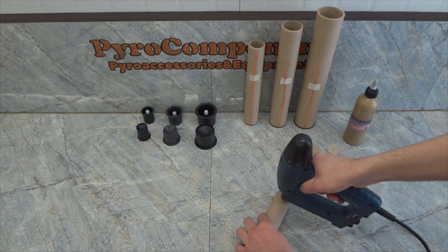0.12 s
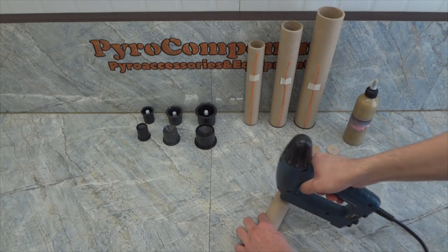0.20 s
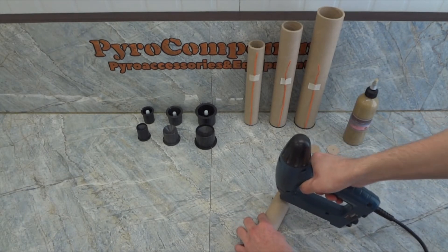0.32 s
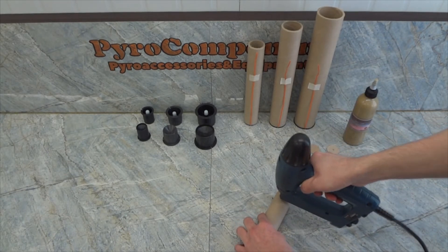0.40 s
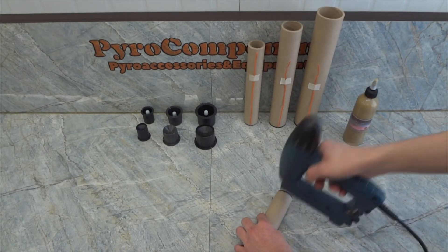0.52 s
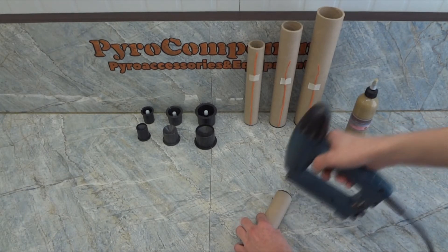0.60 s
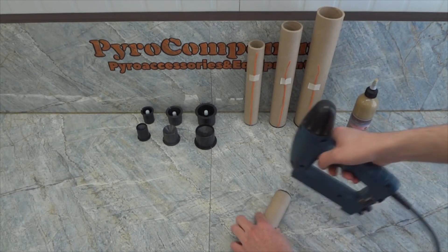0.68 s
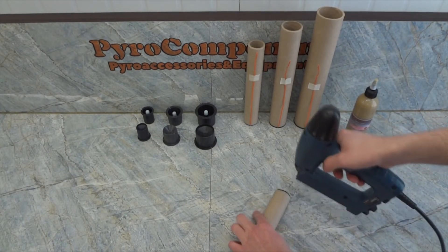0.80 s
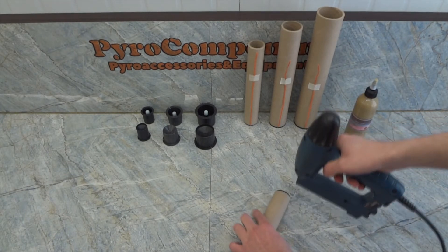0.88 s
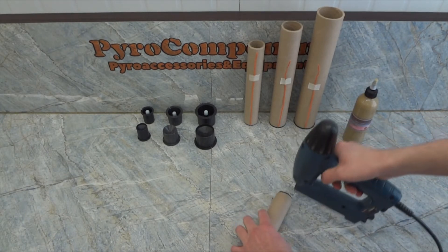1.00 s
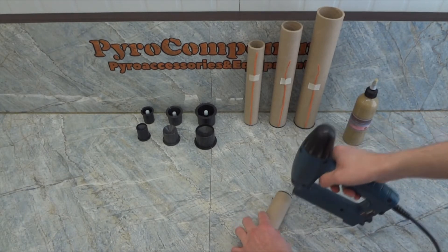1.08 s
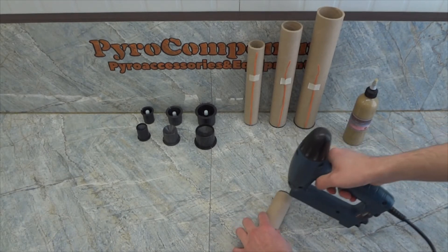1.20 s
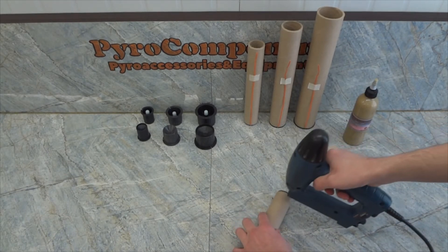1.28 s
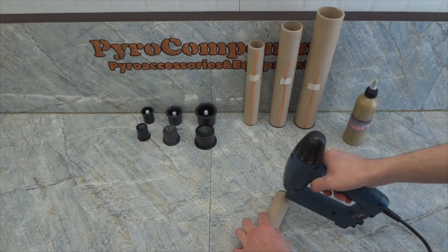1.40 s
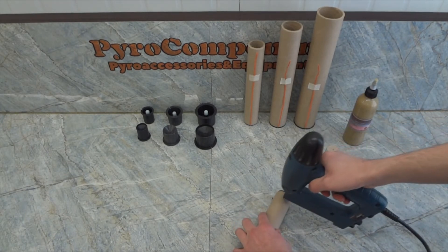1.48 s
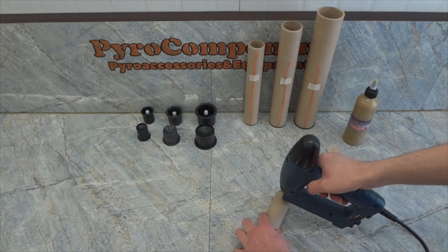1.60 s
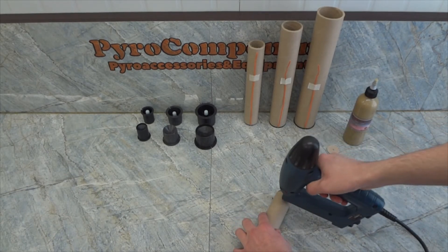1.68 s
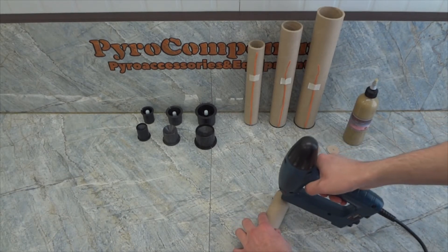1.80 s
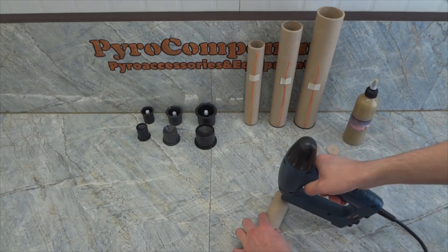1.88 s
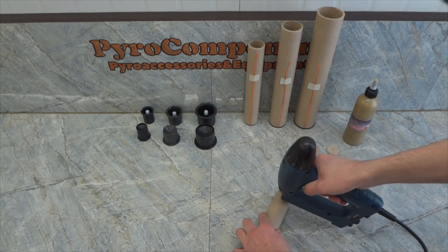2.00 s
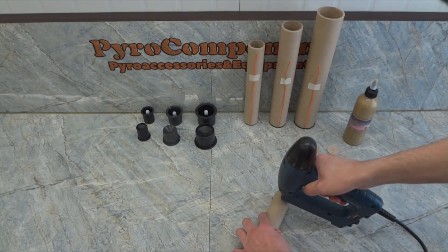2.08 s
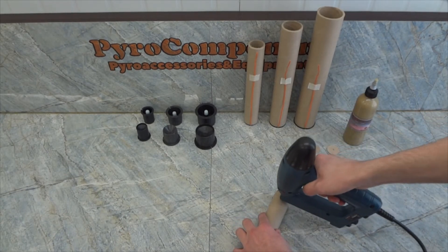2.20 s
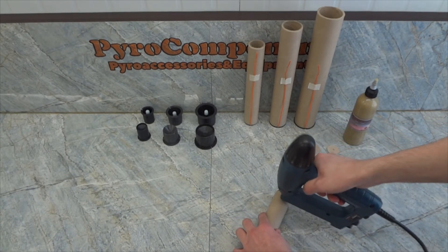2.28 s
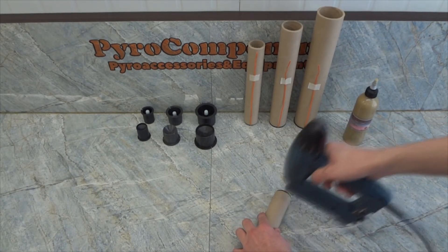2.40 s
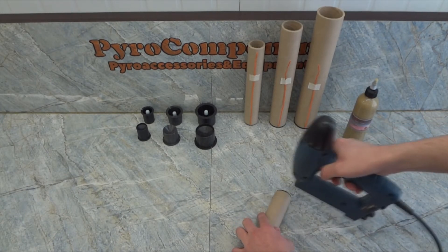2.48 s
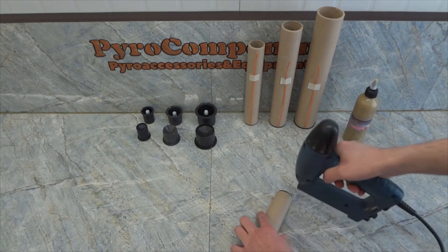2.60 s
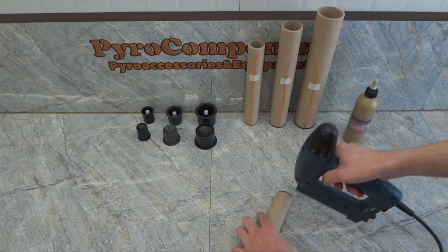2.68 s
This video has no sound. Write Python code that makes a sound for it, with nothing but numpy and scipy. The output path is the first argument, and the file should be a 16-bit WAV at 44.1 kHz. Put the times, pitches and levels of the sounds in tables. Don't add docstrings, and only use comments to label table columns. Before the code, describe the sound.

Electric staple gun shooting twice into a cardboard tube, with clicks and soft knocks between shots

```python
import sys
import numpy as np
from scipy import signal
from scipy.fft import rfft, irfft
from scipy.io import wavfile
from scipy.ndimage import uniform_filter1d

SR = 44100
rng = np.random.default_rng(int(sys.argv[2]) if len(sys.argv) > 2 else 0)


def ratio(d):
    e = np.asarray(d, float) / 20
    return 10 ** e


def int16_out(signal):
    q = np.round(np.clip(np.atleast_2d(signal).T, -1, 1) * 32767)
    wavfile.write(sys.argv[1], SR, q.astype(np.int16))


N = 121275
T = np.arange(N) / SR
HZ = np.fft.rfftfreq(2 * N, 1 / SR) + 1e-3
LEFT_RIGHT = np.array([[1], [-1]])


def curve(table, hz):
    table = np.array(table)
    return np.interp(np.log(hz), np.log(table[:, 0]), table[:, 1])


def colour(x, gain):
    return irfft(rfft(x, 2 * N) * gain)[..., :N]


def causal(db):
    cepstrum = irfft(db * np.log(10) / 20)
    cepstrum[1:N] *= 2
    cepstrum[N + 1:] = 0
    return np.exp(rfft(cepstrum))


def unit(x):
    return x / np.sqrt(np.sum(x ** 2))


def resonate(x, hz, q):
    return signal.lfilter(*signal.iirpeak(hz, q, fs=SR), x)


def bell(distance, width):
    return np.exp(-.5 * (distance / width) ** 2)


def walk(size):
    x = uniform_filter1d(uniform_filter1d(rng.standard_normal(N), size), size)
    return x / x.std()


def add(out, x, t):
    i = int(t * SR)
    out[i:i + len(x)] += x[:N - i]


# f/Hz, t60/s
ROOM_T60 = [(90, 0.8186), (300, 0.632), (700, 0.4145), (1600, 0.4537), (2500, 0.4586), (5000, 0.3886),
            (10000, 0.26235), (15000, 0.2074)]
# f/Hz, side level/dB
ROOM_SIDE = [(60, -42), (125, -32), (250, -24), (500, -19.5), (1000, -12.5), (5000, -12.5), (8500, -13.5),
             (13000, -17)]
# f/Hz, width/octave, share of t60 lost/1
DEAD = [(1130, .12, .2), (1680, .12, .33)]
FIRST_ECHO_S, BUILD_S = 0.00067, 0.0046
LATE_DB, LATE_T60_S, LATE_TOP_HZ = -61, 1.833, 900


def room():
    d = T[:65536]
    noise = rfft(rng.standard_normal((2, len(d))))
    octave = np.log2(np.fft.rfftfreq(len(d), 1 / SR) + 1e-3)
    rise = np.clip((d - FIRST_ECHO_S) / BUILD_S, 0, 1)
    late = ratio(LATE_DB - 60 * d / LATE_T60_S)
    out = 0
    for hz in 30 * 2 ** (np.arange(46) / 5):
        share = np.clip(1 - 5 * abs(octave - np.log2(hz)), 0, 1)
        lost = sum(s * bell(np.log2(hz / centre), width) for centre, width, s in DEAD)
        t60 = curve(ROOM_T60, hz) * (1 - lost)
        decay = np.exp(-np.log(1000) * d / t60) + late / (1 + (hz / LATE_TOP_HZ) ** 2)
        mid, side = irfft(noise * share) * rise * decay
        out = out + mid + ratio(curve(ROOM_SIDE, hz)) * side * LEFT_RIGHT
    return rfft(unit(out) * np.sqrt(2), 2 * N)


# f/Hz, density/(dB per Hz)
HISS = [(30, -18.5), (55, -11.5), (110, -3), (200, -7.5), (500, -7), (1280, -8.5), (2300, -15),
        (13000, -22.5)]
# f/Hz, level/dB
WHINE = [(13485, -83), (13905, -83)]
HISS_DB, HISS_TOP_HZ, FLICKER_DB = -65, 14900, .5
HISS_SIDE_DB, HISS_SIDE_TOP_HZ = 15, 10000
WHINE_WOBBLE_HZ = 25


def hiss():
    spectrum = ratio(curve(HISS, HZ)) / (1 + (HZ / HISS_TOP_HZ) ** 20)
    mid, side = colour(rng.standard_normal((2, N)), spectrum)
    side_gain = ratio(curve(ROOM_SIDE, HZ) + HISS_SIDE_DB) / (1 + (HZ / HISS_SIDE_TOP_HZ) ** 10)
    side = colour(side, side_gain)
    whine = 0
    for hz, db in WHINE:
        phase = 2 * np.pi * np.cumsum(hz + WHINE_WOBBLE_HZ * walk(size=600)) / SR
        whine = whine + np.sqrt(2) * ratio(db) * np.sin(phase)
    level = ratio(HISS_DB + FLICKER_DB * walk(size=2000))
    return (mid + side * LEFT_RIGHT) / mid.std() * level + whine


# start/s, end/s, level/dB, f/Hz
CREAKS = [
    (0, 0.067, -64, 2248),
    (.07, 0.164, -71.5, 5947),
    (0.159, 0.207, -54.5, 5220),
    (0.212, 0.248, -47, 4630),
    (1.65, 1.768, -61.5, 4110),
    (1.708, 1.8, -67, 1890),
    (1.821, 2.1, -72.5, 1910),
    (2.089, 2.186, -60.5, 4510),
    (2.165, 2.182, -57.5, 5000),
]
CREAK_PER_S, CREAK_SPREAD_DB, CREAK_Q = 830, 4, .5


def creaks():
    out = np.zeros(N)
    for start, end, db, hz in CREAKS:
        slips = (rng.random(N) < CREAK_PER_S / SR) * np.sign(rng.standard_normal(N))
        strength = ratio(CREAK_SPREAD_DB * np.minimum(rng.exponential(size=N), 3))
        x = resonate(slips * strength, hz, CREAK_Q)
        out += x / x.std() * ratio(db) * (T >= start) * (T < end)
    return out


KNOCK_S = [0.0175, 0.1760, 0.2340, 1.2514, 1.2520, 1.2560, 1.2625, 1.6335, 1.6340, 1.6385, 1.6930, 1.6950,
           1.7035, 1.7045, 1.7120, 1.7140, 1.7270, 1.7360, 1.7520, 1.7560, 1.8300, 2.0940, 2.1607, 2.1740]
# level/dB, f/Hz, t60/s
KNOCKS = [(-55, 343, 0.034), (-55.5, 362, 0.0225), (-54, 150, 0.028), (-39, 1386, 0.0084),
          (-59, 637.5, 0.028), (-49.5, 1572, 0.0069), (-48, 1806, 0.00775), (-41, 1410, 0.0115),
          (-50, 690, 0.0188), (-36.5, 1700, 0.0116), (-72, 238, 0.025), (-60, 57, 0.1), (-38, 441, 0.033),
          (-37.5, 820, 0.0039), (-38.5, 1700, 0.0133), (-44, 920, 0.037), (-44.5, 600, .03),
          (-46.5, 290, 0.026), (-39.5, 2200, 0.0074), (-56.5, 600, .03), (-85, 62, 0.18),
          (-46.5, 4700, 0.011), (-47, 4700, 0.0083), (-53.5, 100, 0.032)]
KNOCK_ATTACK_S, OVERTONE, OVERTONE_DB = .0005, 1.3, -6.5


def knocks():
    out, d = np.zeros(N), T[:4096]
    for t, (db, hz, t60) in zip(KNOCK_S, KNOCKS):
        ring = np.sin(2 * np.pi * hz * d)
        ring += ratio(OVERTONE_DB) * np.sin(2 * np.pi * OVERTONE * hz * d)
        attack = 1 - np.exp(-d / KNOCK_ATTACK_S)
        add(out, 2 * ratio(db - 60 * d / t60) * ring * attack, t)
    return out


# t/s, level/dB, f/Hz, decay/s
CLICKS = [(0.0300, -48.5, 2800, 0.003), (0.0539, -47, 4140, 0.00088), (0.1611, -38.5, 4980, 0.0011),
          (0.1735, -43, 6118, .001), (0.2125, -51.5, 3950, 0.0023), (0.2245, -36.5, 4500, 0.0018),
          (0.2345, -30, 4647, .001), (0.2385, -15, 7000, 0.0036), (0.758, -60.5, 4468, .002),
          (1.924, -58, 5000, .002), (1.2512, -56, 2800, 0.00224), (2.0937, -49.5, 5100, 0.0032),
          (2.1215, -51.5, 4860, .002), (2.1605, -47, 4000, 0.0022), (2.1748, -24, 4000, 0.0009),
          (2.1788, -26.5, 6100, 0.00067), (1.6335, -46.5, 4040, .002), (1.7010, -50.5, 5000, .008),
          (1.8750, -63.5, 3500, .003), (1.9950, -64, 5800, 0.0028)]
CLICK_ATTACK_S, CLICK_Q = .0004, 0.7


def clicks():
    out, d = np.zeros(N), T[:1024]
    noises = rng.standard_normal((len(CLICKS), len(d)))
    for (t, db, hz, decay_s), noise in zip(CLICKS, noises):
        envelope = np.exp(-d / decay_s) * (1 - np.exp(-d / CLICK_ATTACK_S))
        x = resonate(noise * envelope, hz, CLICK_Q)
        add(out, 2 * ratio(db) * x / abs(x).max(), t)
    return out


# t/s, level/dB, pan/dB, metal ring/dB
SHOTS = [
    (0.2415, 0, 0.2, 5),
    (2.1820, 0, 0.2, 1),
]
# f/Hz, level/dB, t60/s
RINGS = [(1314, -56.5, 2.5), (1960, -29, .78), (1740, -44, .9)]


def rings():
    out = np.zeros(N)
    for t, _, _, ring_db in SHOTS:
        since = np.clip(T - t, 0, None)
        for hz, db, t60 in RINGS:
            out += (T >= t) * ratio(db + ring_db - 60 * since / t60) * np.sin(2 * np.pi * hz * T)
    return out


# f/Hz, density/(dB per Hz)
BANG = [(40, -44.5), (80, -39.5), (200, -32), (570, -7.5), (1100, -10), (4000, -9), (10000, -8.5),
        (16000, -10)]
# f/Hz, width/Hz, boost/dB
BODY = [(55, 17, 5), (125, 56, 11), (315, 54, 5.5), (702.7, 72, 7.5), (918.3, 110, 5), (1600, 120, 2),
        (1997.4, 200, 5), (2800, 320, 2)]
BANG_DB, RATTLE_DECAY_S, RATTLE_DB = 47, 0.0096, -8


def shots():
    out = np.zeros((2, N))
    boost_db = sum(boost * bell(2 * (HZ - hz), width) for hz, width, boost in BODY)
    body = causal(curve(BANG, HZ) + boost_db)
    for t, level_db, pan_db, _ in SHOTS:
        impulse = np.zeros(N)
        impulse[int(t * SR)] = 1
        pulse = unit(colour(impulse, body))
        shake = (T >= t) * np.exp(-np.clip(T - t, 0, None) / RATTLE_DECAY_S)
        rattle = unit(colour(rng.standard_normal(N) * shake, body))
        heard = colour(pulse, room()) + ratio(RATTLE_DB) * rattle
        out += heard * ratio(BANG_DB + level_db + pan_db * LEFT_RIGHT / 2)
    return out


CLICK_WET_DB, KNOCK_WET_DB = -4, -2
THUD_DRY_HZ = 500


def scene():
    tick, knock = clicks() + creaks(), knocks()
    echoing = colour(knock, 1 / (1 - 1j * THUD_DRY_HZ / HZ))
    wet = ratio(CLICK_WET_DB) * tick + ratio(KNOCK_WET_DB) * echoing
    return shots() + tick + knock + colour(wet, room()) + rings() + hiss()


def low_pass(x):
    return signal.sosfilt(signal.butter(12, 16640, fs=SR, output="sos"), x)


DUCK_DB, DUCK_HOLD_S, DUCK_KNEE_S, DUCK_CURVE = -33.5, 0.1835, 0.018, 1.23
DUCK_ATTACK_S, OVERSHOOT_DB = 0.0024, 6
SLOW_DUCK_DB, SLOW_RECOVER_S = -3, 1.5
CEILING, TOP_HZ = 1.3, 15450


def record(dry):
    gain_db = np.zeros(N)
    for t, *_ in SHOTS:
        d = np.clip(T - t, 0, None)
        left = DUCK_KNEE_S * np.logaddexp(0, (DUCK_HOLD_S - d) / DUCK_KNEE_S) / DUCK_HOLD_S
        duck = DUCK_DB * left ** DUCK_CURVE
        overshoot = OVERSHOOT_DB * np.exp(-d / DUCK_ATTACK_S)
        slow = SLOW_DUCK_DB * np.clip(1 - d / SLOW_RECOVER_S, 0, 1)
        gain_db += (T >= t) * (duck + overshoot + slow)
    x = CEILING * np.tanh(dry * ratio(gain_db) / CEILING)
    lowpass = signal.ellip(8, .2, 70, TOP_HZ, fs=SR, output="sos")
    return low_pass(signal.sosfilt(lowpass, x))


dry = scene()
out = record(dry)
int16_out(out)
```